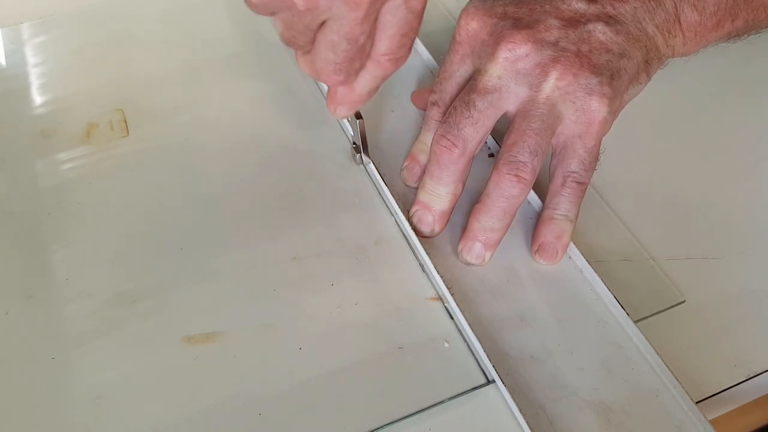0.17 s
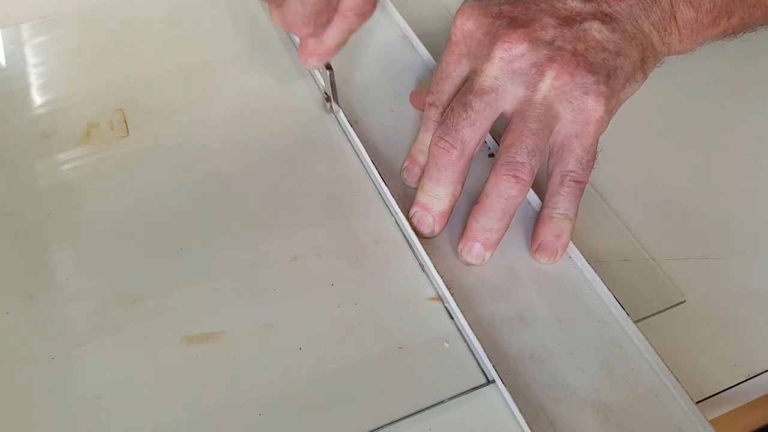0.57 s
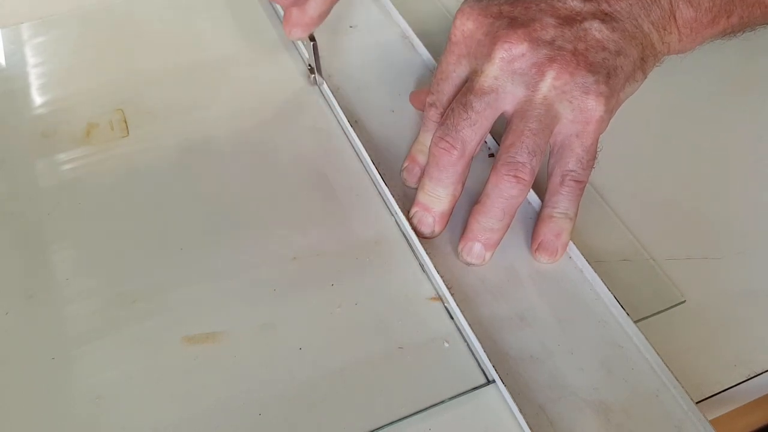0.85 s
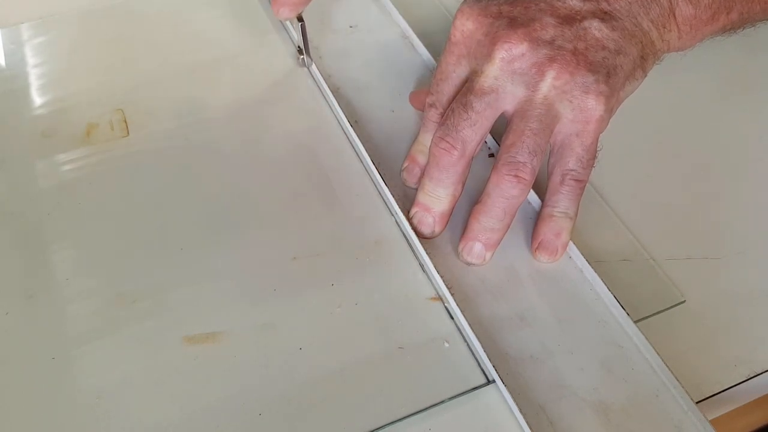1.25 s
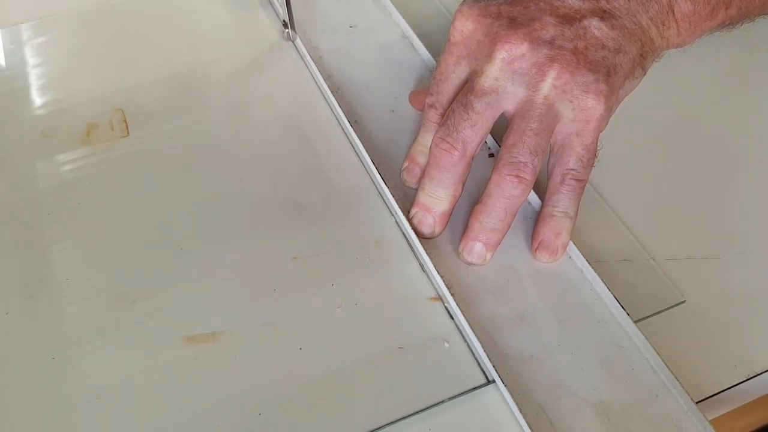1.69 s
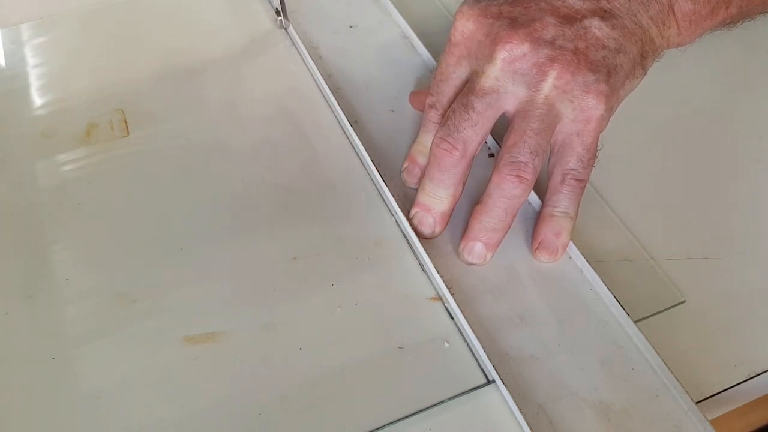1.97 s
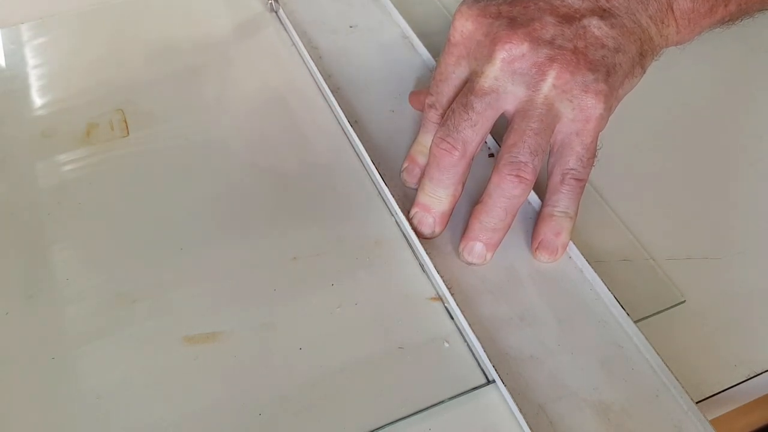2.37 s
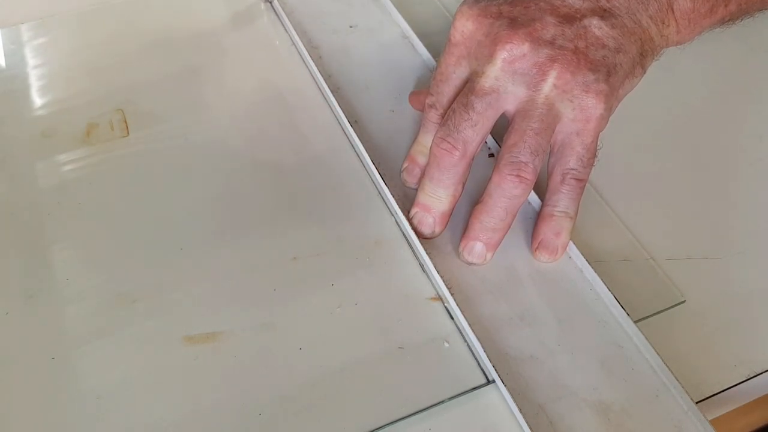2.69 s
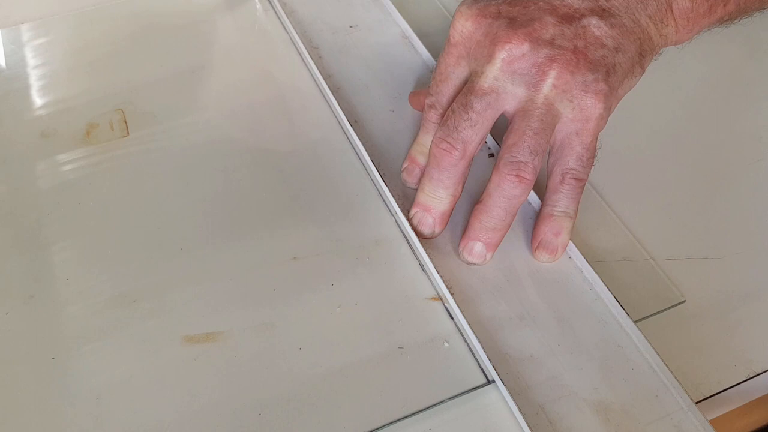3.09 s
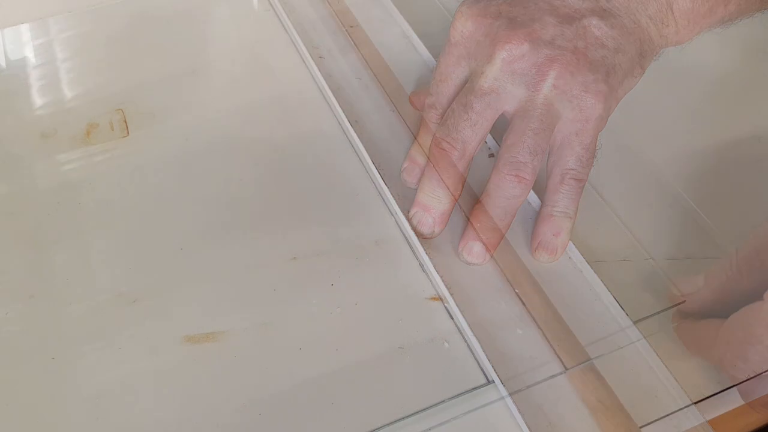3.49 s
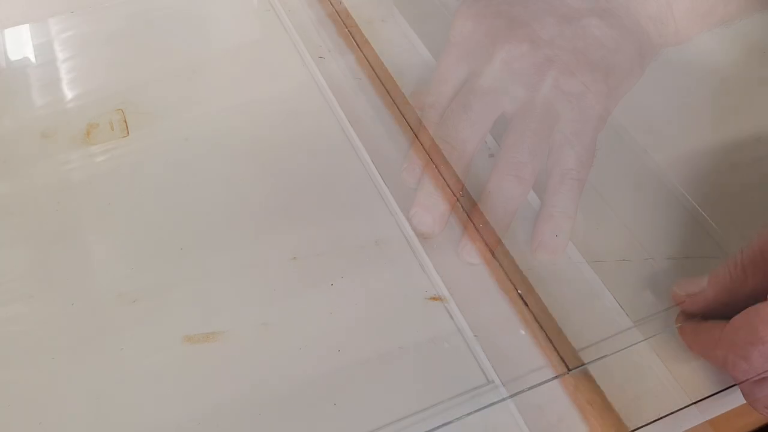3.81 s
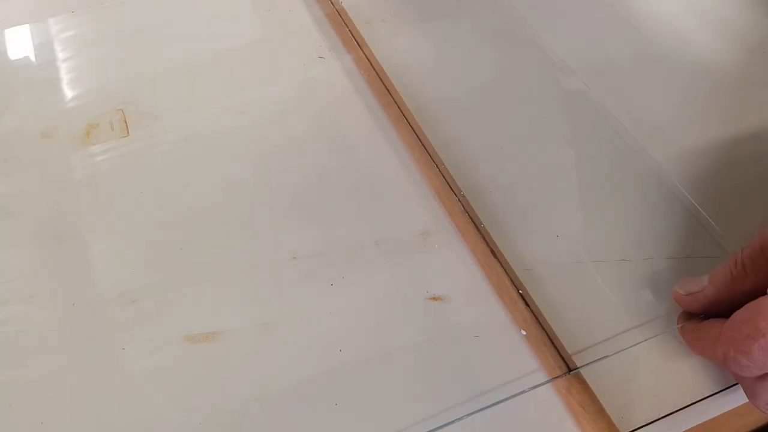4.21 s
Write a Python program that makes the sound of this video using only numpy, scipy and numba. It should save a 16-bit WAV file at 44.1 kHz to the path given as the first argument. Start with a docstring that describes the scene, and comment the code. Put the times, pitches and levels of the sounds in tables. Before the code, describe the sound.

A cutter wheel bites along a glass sheet in irregular jerks, each a thin ringing crackle, with deep soft shoves of the table beneath. Faint wavering squeaks come from the rule mid-cut. The scraping stops near three and a half seconds, leaving soft wooden knocks and barely audible airy whistles. Close microphone, left side much louder, light room tail and faint air.

```python
"""A glass cutter's wheel bites in jerks along a straight edge, left of a close microphone: bursts of random
chips and snaps drive a glassy treble ring and a smoother midrange, while shoves rumble the table's modes.
Soon the cutter's side squeaks on the rule in wavering harmonic noise. Late in the cut come two soft wooden
knocks, and more after it with brief breathy whistles. Room air and a short diffuse tail run throughout."""
import sys
import numpy as np
from scipy import signal
from scipy.fft import rfft, irfft, next_fast_len
from scipy.io import wavfile
from scipy.ndimage import uniform_filter1d
from numba import njit

SR = 44100
rng = np.random.default_rng(int(sys.argv[2]) if len(sys.argv) > 2 else 0)


def unload_audio(sound):
    """Save the sound as a 16-bit wav file, at the path given as the first command line argument."""
    columns = np.transpose(np.atleast_2d(sound))
    # keep every value between -1 and 1, then stretch to whole-number steps
    steps = np.round(np.clip(columns, -1, 1) * 32767)
    wavfile.write(sys.argv[1], SR, steps.astype(np.int16))


def convert_level_to_amplitude(level_db):
    """Map a level in decibels to its linear amplitude factor."""
    exponent = np.asarray(level_db, float) / 20
    return 10 ** exponent


N = 191614
T = np.arange(N) / SR


def noise():
    """White noise over the whole scene."""
    return rng.standard_normal(N)


def unit(x):
    """Scale to rms 1."""
    return x / np.sqrt(np.mean(x ** 2))


def colour(x, points):
    """Filter by (frequency [Hz], gain [dB]) points, straight lines over log frequency."""
    hz, db = np.transpose(points)
    size = next_fast_len(x.shape[-1])
    f = np.maximum(np.fft.rfftfreq(size, 1 / SR), 1)
    gain = convert_level_to_amplitude(np.interp(np.log(f), np.log(hz), db))
    return irfft(rfft(x, size) * gain, size)[..., :x.shape[-1]]


@njit
def svf(x, hz, width):
    """State-variable band-pass with a moving centre and width, gain 1 at the centre."""
    y, b, l = np.empty(len(x)), 0., 0.
    for i in range(len(x)):
        g, k = np.tan(np.pi * hz[i] / SR), width[i] / hz[i]
        v = (b + g * (x[i] - l)) / (1 + g * (g + k))
        b, l, y[i] = 2 * v - b, l + 2 * g * v, k * v
    return y


def band(x, hz, width_hz):
    """Band-pass whose centre and width are each fixed or moving."""
    return svf(x, hz + 0 * T, width_hz + 0 * T)


def walk(rate_hz):
    """Random levels held 1 / rate s and slewed; spread 1."""
    hold = max(int(SR / rate_hz), 2)
    held = rng.standard_normal(N // 20)[np.arange(N) // hold]
    return unit(uniform_filter1d(held, hold // 2 + 1))


def smear(x, t60_s, share):
    """Dense early echoes: the sound plus a short random tail."""
    t = np.arange(SR // 10) / SR
    tail = rng.standard_normal(len(t)) * 1000. ** (-t / t60_s)
    tail = tail / np.sqrt((tail ** 2).sum())
    return x + share * signal.fftconvolve(x, tail)[:len(x)]


def shifting(x, t60_s, share, turn_s):
    """Early echoes that change as the hand moves: two random tails fading into each other."""
    place = np.pi * T / turn_s
    echo_a = smear(x, t60_s, share) - x
    echo_b = smear(x, t60_s, share) - x
    return x + np.cos(place) * echo_a + np.sin(place) * echo_b


def steady(x, share):
    """Noise with its random swelling partly evened out, for a steadier rumble or squeak; rms 1."""
    swell = np.abs(signal.hilbert(x, next_fast_len(N))[:N])
    return unit(x / (swell + 0.34 * swell.mean()) ** np.clip(share, 0, 1))


def chips(per_s, spread_db, bed):
    """Dense tiny fractures of very unequal size over a fine grinding; rms 1."""
    hit = rng.random(N) < per_s / SR
    size_db = spread_db * np.minimum(rng.exponential(size=N), 2.5)
    return unit(unit(hit * convert_level_to_amplitude(size_db) * noise()) + bed * noise())


# jerks of the wheel: (start [s], length [ms], level at start [dB], level at end [dB])
BITES = [(0.063, 10, -31, -47), (0.075, 44.5, -36, -42), (0.13, 40, -30.5, -29.5), (0.18, 20, -39, -39),
         (0.24, 6.2, -34, -38), (0.248, 10.7, -33, -22.5), (0.337, 22.5, -33.5, -26.5),
         (0.384, 16, -33.5, -35.5), (0.447, 7.8, -43, -14.5), (0.4745, 9.4, -21.5, -31),
         (0.496, 5.2, -14, -26), (0.5005, 4, -11.5, -18), (0.508, 11.3, -17, -32), (0.521, 24, -31, -36),
         (0.555, 8.6, -20, -15.5), (0.563, 13.4, -22.5, -33), (0.595, 19.5, -27, -36.5),
         (0.641, 6.6, -31.5, -36), (0.735, 4.2, -46, -52), (0.963, 16, -50, -43), (0.976, 6.2, -37, -46),
         (0.995, 4.7, -37, -51), (1.034, 3.2, -52, -46), (1.08, 6.9, -57, -47), (1.172, 2.1, -34.5, -32),
         (1.253, 37, -44, -82), (1.283, 59, -37.5, -66), (1.343, 3.9, -31.5, -32.5), (1.352, 8.9, -50, -31),
         (1.376, 11.4, -34, -38), (1.3835, 3.1, -29, -31), (1.389, 15.6, -21.5, -34.5),
         (1.405, 19, -38, -34), (1.439, 12, -27, -37), (1.449, 7.8, -26, -33), (1.462, 5, -32, -30),
         (1.476, 4.2, -44, -32), (1.487, 8.7, -45, -27), (1.496, 41, -30, -29), (1.543, 11, -30.5, -36),
         (1.561, 8.5, -27, -36), (1.571, 17, -30.5, -36), (1.586, 6.8, -32, -32), (1.592, 8.3, -30, -30.5),
         (1.604, 39, -31.5, -43.5), (1.656, 48, -33, -38), (1.694, 60, -37.5, -32.5), (1.766, 10, -57, -36),
         (1.82, 8.2, -39, -64), (1.837, 11, -35.5, -45.5), (1.935, 8.4, -69, -44), (1.996, 19, -35.5, -34),
         (2.037, 24, -29.5, -35), (2.06, 3.4, -33, -28), (2.127, 10.7, -35, -37.5),
         (2.149, 25.4, -32, -31.5), (2.201, 15, -31.5, -37), (2.227, 83, -38, -29.5),
         (2.319, 89, -28.5, -34), (2.53, 13, -33, -44), (2.563, 3.3, -27, -49), (2.569, 25.3, -33, -29.5),
         (2.608, 67, -30.5, -33), (2.682, 72, -31, -29.5), (2.764, 21, -31, -26), (2.937, 4.8, -41, -29.5),
         (2.946, 23.2, -32, -25), (2.979, 56.5, -29.5, -27), (3.098, 6, -34, -31.5), (3.112, 4.4, -35, -34),
         (3.1175, 3.5, -30.5, -38), (3.122, 10.4, -28.5, -35.5), (3.149, 5.5, -35.5, -40),
         (3.298, 6, -40, -44), (3.312, 6.6, -36, -37.5), (3.319, 13, -39, -49), (3.395, 2.8, -37, -40),
         (3.403, 42, -32, -26.5), (3.447, 23, -27, -37.5), (3.474, 3.8, -21, -52)]
# light creeping between jerks: (start [s], length [ms], level at start [dB], level at end [dB])
CREEPS = [(0.0, 51, -41, -52), (0.033, 39, -43.5, -47), (0.576, 275, -37.5, -49.5),
          (0.886, 550, -45.5, -78), (1.148, 42, -53.5, -47), (1.31, 35, -55, -44), (1.776, 240, -52, -61),
          (2.42, 120, -58, -48), (2.9, 52, -52, -71), (3.2, 50, -57, -56.5), (3.287, 6.5, -55.5, -41)]


def force():
    """Each jerk switches the crushing on; within it the wheel stutters every few milliseconds."""
    crack_db = 28  # snap over push as the wheel breaks loose
    crack_most_db, crack_most_db_per_s = -23, 4.2  # ceiling, rising with travel
    within_db, creep_crack_db = -7, -9  # softer within a jerk, and when creeping
    push, cracks = np.zeros(N), np.zeros(N)
    scatter_db = 3 * noise()
    slips = np.cumsum(120 * convert_level_to_amplitude(4.8 * walk(90))) / SR
    depth_db = np.maximum(15.8 + 1.5 * walk(12), 0)
    for rows, softer_db in ((BITES, 0), (CREEPS, creep_crack_db)):
        for s, ms, start_db, end_db in rows:
            i = int(s * SR)
            t_ms = 1000 * T[:int((ms / 1000 + .04) * SR)]
            span = slice(i, i + len(t_ms))
            shape = (1 - np.exp(-t_ms / .2)) * np.exp(-np.maximum(t_ms - ms, 0) / 1.6)
            # every slip starts abruptly and dies away until the next, at an uneven beat
            since = (slips[span] - slips[i]) % 1
            snaps = (np.diff(since, prepend=1) < 0) & (t_ms < ms)
            fall = since ** 0.64  # fastest just after the start
            db = start_db + (end_db - start_db) * np.minimum(t_ms / ms, 1)
            light = np.clip((-26.0 - db) / 14.6, .2, 1.5)  # a hard push leaves shallower gaps
            push[span] += convert_level_to_amplitude(db - light * depth_db[span] * fall) * shape
            snap_db = np.minimum(db + crack_db, crack_most_db + crack_most_db_per_s * s)
            snap_db = snap_db + (t_ms > 0) * (within_db + scatter_db[span])
            cracks[span] += snaps * convert_level_to_amplitude(snap_db + softer_db)
    return push, cracks


# colour of crushed glass: (frequency [Hz], density [dB per Hz])
CRUSH = [(200, -33.5), (441, -34), (754, -28), (1230, -22), (2400, -14), (3590, -20), (6030, -19.5),
         (8000, -14), (9800, -1), (11500, -1), (15700, -3.5), (16100, -52.5)]
# ring the wheel finds along the score: (time [s], mean frequency [Hz])
RING = [(0, 11800), (.15, 12010), (.4, 12440), (.45, 12440), (.475, 11390), (.55, 11950), (.58, 11340),
        (.7, 11860), (1.2, 12660), (1.4, 13330), (1.9, 12300)]
# broader ring above it: (frequency [Hz], width [Hz], level before a 12.5 dB cut [dB])
UPPER_RING = (12960, 490, 0.62)


def wheel(push, cracks):
    """Crushed chips drive the sheet: treble with a ring, and a smoother midrange."""
    stutter = convert_level_to_amplitude(0.47 * walk(170) + 0.46 * walk(780))
    # dB over a middling push of -38 dB: a hard bite rings more and sounds thinner
    hard_db = np.clip(20 * np.log10(uniform_filter1d(push, 400) + 1e-9) + 38, -14, 22)
    # each level: start, change per second of travel, change per dB of push
    ring_db = 1.5 - 7 * T + 0.35 * np.maximum(hard_db, -0.5)
    shoulder_db = np.minimum(-7 + 3 * T - 0.23 * hard_db, -0.5)  # 7-11 kHz
    body_db = -1.5 + 1.7 * T - 0.38 * hard_db  # under 7 kHz

    crush = unit(colour(chips(per_s=5200.0, spread_db=5.5, bed=0.61), CRUSH))
    treble = [(5000, -30), (6500, -6), (7500, 0)]
    top = push * stutter * colour(crush, treble) + colour(colour(cracks, CRUSH), treble)
    shoulder = colour(top, [(11000, 1.5), (11800, -49)])
    top = top + (convert_level_to_amplitude(shoulder_db) - 1) * shoulder
    # waves run round the sheet, so every stretch of the score favours other modes
    top = shifting(top, t60_s=.015, share=.45, turn_s=.12)

    ring_hz = np.interp(T, *np.transpose(RING)) * (1 + 0.02 * walk(58))
    ring = band(top, ring_hz, 197 + 66 * T)
    upper_hz, upper_width_hz, upper_db = UPPER_RING
    ring = ring + convert_level_to_amplitude(upper_db - 12.5) * band(top, upper_hz, upper_width_hz)
    bright = (top + convert_level_to_amplitude(11.0 + ring_db) * ring) / np.sqrt(1 + convert_level_to_amplitude(2 * ring_db))

    # the whole sheet carries the midrange: smoother and slower to stop
    grind = unit(colour(chips(per_s=3700.0, spread_db=-8.0, bed=3.6), CRUSH))
    drive = uniform_filter1d(push, 150) * convert_level_to_amplitude(body_db)
    mid = drive * colour(grind, [(6800, -2.5), (7800, -3.5), (9000, -11.0)])
    sheet = bright + shifting(mid, t60_s=0.25, share=0.72, turn_s=.15)
    return colour(sheet, [(15600, 0), (15950, -30)])


# the hand shoves the table: (start [s], hold [s], level [dB], upper modes relative to it [dB])
SHOVES = [(0, 0.11, -43.5, -14), (0.141, 0.0078, -39, -16), (0.24, 0.16, -43.5, -13.5),
          (0.409, 0.1, -38, -9.5), (0.547, 0.085, -41.5, -16.5), (0.756, 0.048, -47.5, -18.5),
          (0.916, 0.018, -52.5, -10.5), (0.972, 0.0067, -48.5, -21), (1.176, 0.015, -35.5, -43),
          (1.332, 0.068, -49, -8), (1.513, 0.005, -48, -49), (1.586, 0.19, -49, -19.5),
          (1.97, 0.078, -53, -14), (2.128, 0.064, -52.5, -16), (2.297, 0.083, -51, -7),
          (2.467, 0.06, -58, -5.5), (2.516, 0.16, -57, -28), (2.605, 0.028, -52, -15),
          (2.726, 0.039, -44, -18), (2.949, 0.054, -43.5, -12), (3.077, 0.05, -50, -16),
          (3.246, 0.11, -55, -14.5), (3.44, 0.02, -49, -21), (3.875, 0.065, -54.5, -4.5),
          (4.01, 0.11, -66.5, -2)]
# modes: (frequency [Hz], nominal width [Hz], relative level [dB])
TABLE_LOW = [(43.84, 13, -7), (63.3, 14.1, -4)]
TABLE_HIGH = [(116.7, 23.4, 3), (182, 69, -1), (263, 590, -15)]


def table_modes(modes):
    """Noise through two like band-passes per mode, summed; rms 1."""
    total = 0
    for hz, width_hz, db in modes:
        once = band(noise(), hz, 1.14 * width_hz)
        total = total + convert_level_to_amplitude(db) * unit(band(once, hz, 1.14 * width_hz))
    return unit(total)


def table():
    """Shoves shake the lowest modes of table and sheet; the upper modes die away at their own pace."""
    rise_s, low_db_per_s, upper_db_per_s = 0.018, -170, -110
    push, upper = 0, 0
    for s, hold_s, db, upper_db in SHOVES:
        t = np.maximum(T - s, 0)
        rise = np.sin(np.pi / 2 * np.minimum(t / rise_s, 1)) ** 2
        after = np.maximum(t - hold_s - rise_s, 0)
        push = push + convert_level_to_amplitude(db + low_db_per_s * after) * rise
        upper = upper + convert_level_to_amplitude(db + upper_db + upper_db_per_s * after) * rise
    return push * steady(table_modes(TABLE_LOW), 0.44) + upper * table_modes(TABLE_HIGH)


# colour of room air: (frequency [Hz], density [dB per Hz])
AIR = [(30, -9.5), (50, -7.5), (76, -2), (432, -17), (593, -18), (1000, -19), (2300, -16.5), (3300, -23),
       (6720, -33.5), (12000, -21.5), (15700, -18.5), (16100, -55.5)]


def room_air():
    """Steady coloured noise, shared by both ports in the bass, 4 dB stronger in the left."""
    same, apart = noise(), rng.standard_normal((2, N))
    shared = colour(same, [(100, 4.0), (600, -12.0), (2000, -30.5)])
    return unit(colour(apart + shared, AIR)) * convert_level_to_amplitude(-69.5 + np.array([[4], [0]]))


# reverberation: (frequency [Hz], t60 [s])
ROOM_T60 = [(250, 0.46), (1000, 0.2), (4000, 0.22), (12000, 0.21)]


def room(x):
    """Diffuse tail, its own for each port, its decay time set by frequency."""
    t = np.arange(SR // 2) / SR
    hz, t60_s = np.transpose(ROOM_T60)
    tail = 0
    for k in range(len(hz)):
        tent = [(f, 0 if j == k else -30) for j, f in enumerate(hz)]
        tail = tail + colour(rng.standard_normal((2, len(t))), tent) * 1000. ** (-t / t60_s[k])
    tail = tail * (1 - np.exp(-t / 0.0013))
    tail = tail / np.sqrt((tail ** 2).sum(axis=1, keepdims=True))
    return signal.fftconvolve(x[None], tail, axes=1)[:, :N]


# squeaks on the rule:
# (middle [s], half length [s], mean slip rate [Hz], level [dB], rise per multiple [dB])
SQUEAKS = [(0.56, 0.092, 850, -61, 2), (0.845, 0.12, 845, -64, -1.5), (1.017, 0.048, 812, -60, 1),
           (1.214, 0.077, 817, -61, 3), (1.531, 0.12, 873, -57, -3.5), (1.72, 0.052, 835, -52.5, 2.5),
           (1.842, 0.067, 850, -55.5, 5.5), (2.102, 0.11, 838, -60.5, 3.5), (2.82, 0.04, 850, -57.5, -2.5),
           (2.87, 0.028, 835, -57, 2), (2.92, 0.034, 863, -64.5, -4)]
# harmonics: (multiple of slip rate, relative level [dB])
RUB_ORDERS = [(1, -11.5), (2, 7), (3, 7), (4, -5.5), (5, -12)]


def rule():
    """Stick-slip against the rule: a wavering, patchy harmonic squeak, mostly breathy."""
    s, half_s, pitch_hz, db, rise = np.transpose(SQUEAKS)
    swell = sum(convert_level_to_amplitude(d) * np.exp(-((T - a) / h) ** 2) for a, h, d in zip(s, half_s, db))
    rise_db = np.interp(T, s, rise)
    hz = np.interp(T, s, pitch_hz) * (1 + .011 * walk(20))
    lines = 0
    for k, order_db in RUB_ORDERS:
        line = steady(band(noise(), k * hz, 88.0), 0.1)
        lines = lines + convert_level_to_amplitude(order_db + (k - 3.0) * rise_db) * line
    return unit(lines) * swell * convert_level_to_amplitude(3.55 * walk(30))


# knocks: (time [s], level before a 2 dB lift [dB], push [ms], favoured frequency [Hz])
KNOCKS = [(2.769, -60, 2.4, 387), (2.984, -50.5, 2, 434), (3.56, -58.5, 0.29, 809),
          (3.715, -54.5, 0.69, 592), (3.834, -52.5, 1.3, 686), (3.863, -52.5, 0.21, 1400),
          (3.884, -40.5, 0.33, 700), (4.048, -47, 0.52, 400), (4.058, -37.5, 0.16, 436),
          (4.077, -42, 0.44, 170), (4.13, -51.5, 1, 301), (4.198, -58.5, 1.66, 642)]
# wooden modes: (mean frequency [Hz], mean level [dB], t60 [s])
WOOD = [(126, -9.5, 0.18), (201.8, -1.5, 0.087), (351.4, -1, 0.048), (465.5, -7.5, 0.069),
        (597, 4.5, 0.035), (737, -3.5, 0.039), (869, 4, 0.025), (994, 4, 0.025), (1150, -7, 0.034),
        (1400, -5, 0.035)]


def knocks():
    """Soft pushes with a short rattle into wooden modes, each struck at another spot."""
    out, t = np.zeros(N + SR), np.arange(SR // 4) / SR
    hz, db, t60_s = (c[:, None] for c in np.transpose(WOOD))
    for s, level_db, push_ms, spot_hz in KNOCKS:
        vary_level, vary_phase, vary_pitch = rng.standard_normal((3, len(WOOD), 1))
        soft = 1 / (1 + (hz * push_ms / 1000) ** 2)
        away_db = 6 * np.abs(np.log2(hz / spot_hz))  # 6 dB per octave from the favoured modes
        gain = soft * convert_level_to_amplitude(db + 1.4 * vary_level - away_db)
        phase = 2 * np.pi * hz * (1 + 0.017 * vary_pitch) * t + 0.46 * vary_phase
        ring = (gain * np.sin(phase) * 1000. ** (-t / t60_s)).sum(axis=0)
        ring = smear(ring * (1 - np.exp(-t / 0.0022)), t60_s=0.18, share=1.0)
        i = int(s * SR)
        out[i:i + len(t)] += convert_level_to_amplitude(level_db + 2.0) * ring / np.abs(ring).max()
    return out[:N]


# whistles: (middle [s], half length [s], frequency [Hz], level [dB])
WHISTLES = [(3.728, 0.078, 2490, -70.5), (3.881, 0.035, 2250, -67.5), (4.099, 0.049, 3640, -77)]


def whistles():
    """Brief breathy whistles of narrow-band noise, barely over the room air."""
    out = 0
    for s, half_s, hz, db in WHISTLES:
        swell = np.exp(-((T - s) / half_s) ** 4)
        out = out + convert_level_to_amplitude(db) * swell * unit(band(noise(), hz, 96.0))
    return out


# shading of the right port: (frequency [Hz], gain [dB])
SHADE = [(60, -3), (380, -9.5), (1300, -14.5), (2400, -23.5), (4400, -16.5), (8000, -22.5), (15000, -20)]


def scene():
    """The left port faces the work; the right hears it shaded, a little later, mostly by reflections."""
    near = wheel(*force()) + rule() + knocks() + whistles()
    low = table()
    reflected = shifting(near, t60_s=0.081, share=6.0, turn_s=0.17) / 4.2
    right = colour(np.roll(reflected + low, 5), SHADE)  # 5 samples later
    wet = room(near) * convert_level_to_amplitude([[-15.5], [-24]])
    return np.array([near + low, right]) + wet + room_air()


def roll_off(x):
    """The treble ends steeply here."""
    return signal.sosfilt(signal.butter(12, 16820, fs=SR, output="sos"), x)


def record(dry):
    """The microphone loses the deepest bass, under 39 Hz."""
    mix = signal.sosfilt(signal.butter(4, 39, "high", fs=SR, output="sos"), dry)
    return roll_off(mix)


dry = scene()
out = record(dry)
unload_audio(out)
```